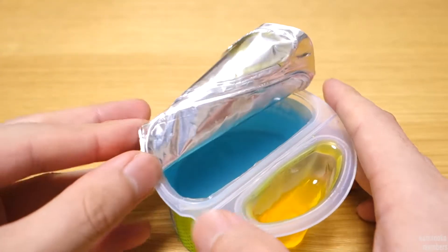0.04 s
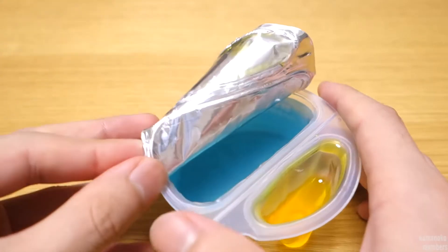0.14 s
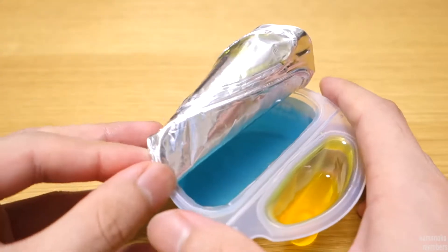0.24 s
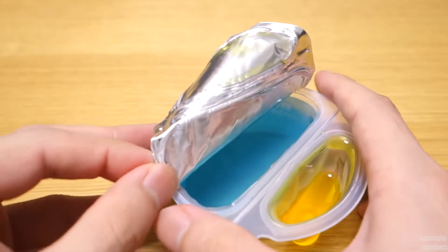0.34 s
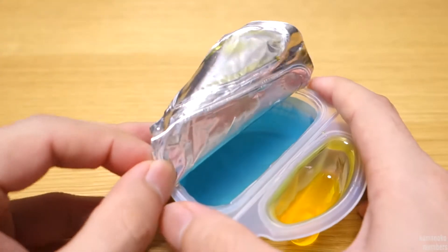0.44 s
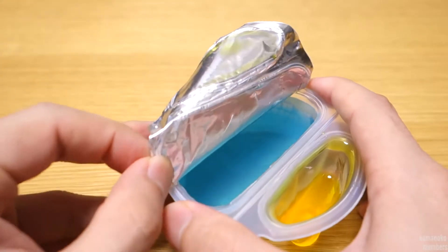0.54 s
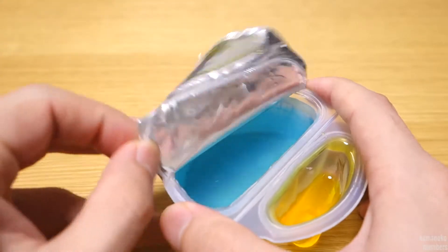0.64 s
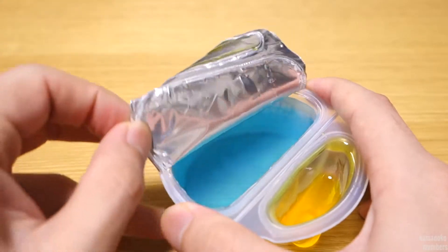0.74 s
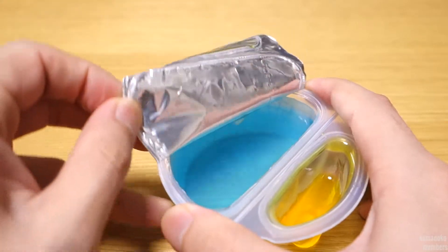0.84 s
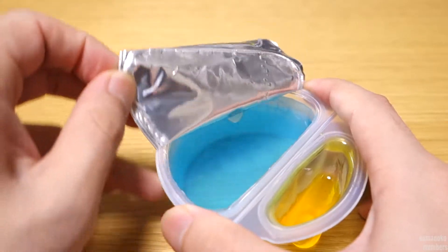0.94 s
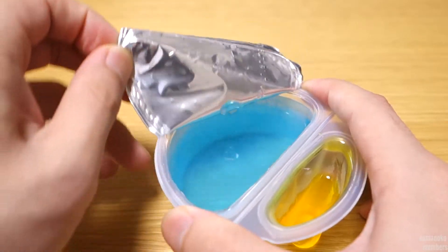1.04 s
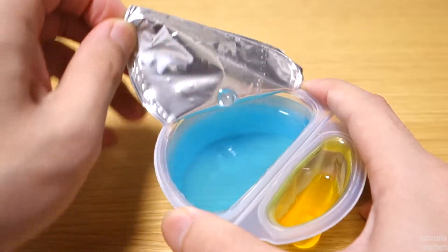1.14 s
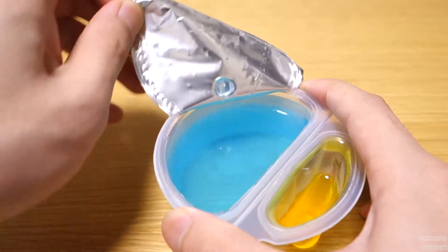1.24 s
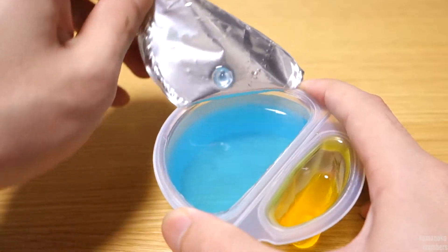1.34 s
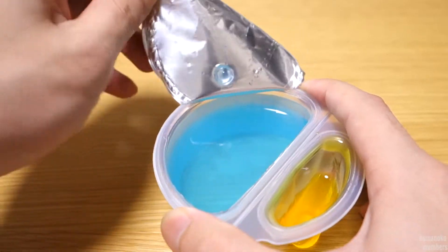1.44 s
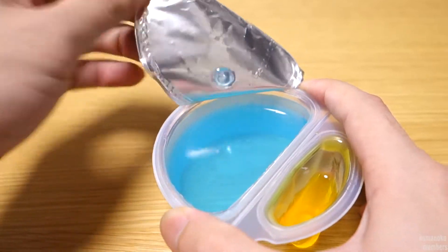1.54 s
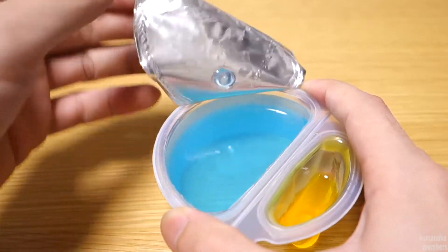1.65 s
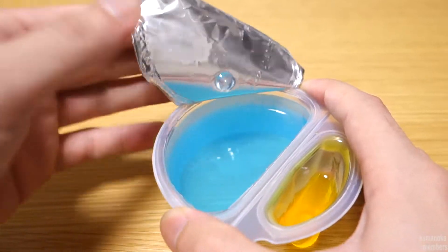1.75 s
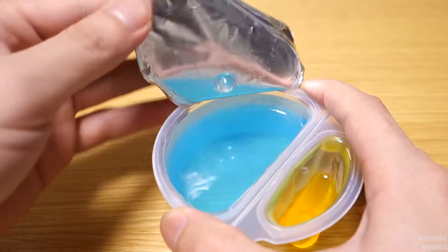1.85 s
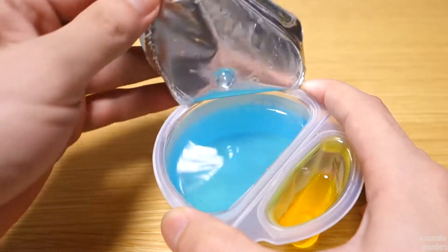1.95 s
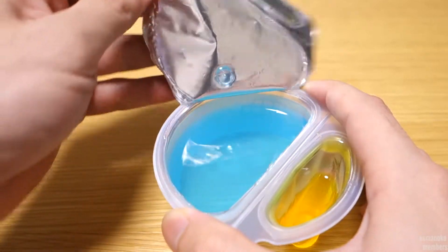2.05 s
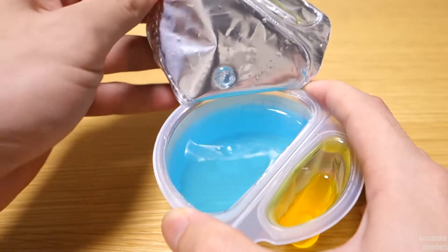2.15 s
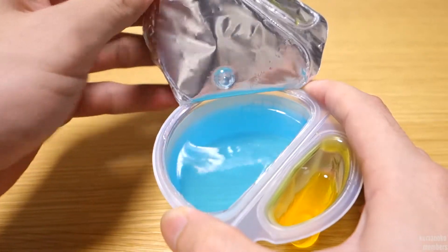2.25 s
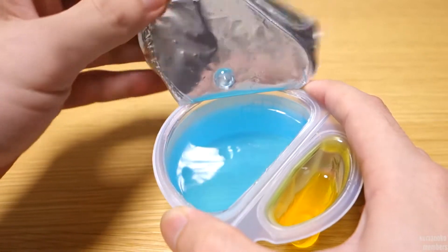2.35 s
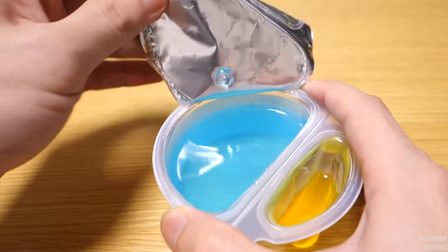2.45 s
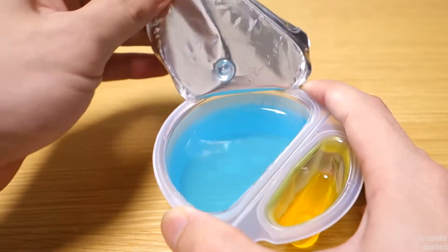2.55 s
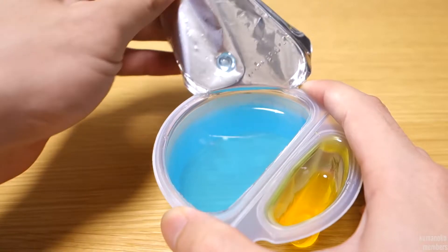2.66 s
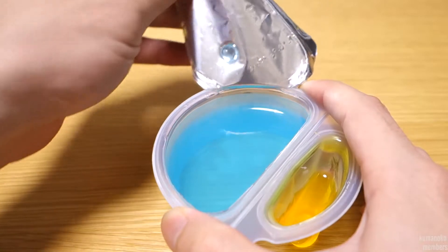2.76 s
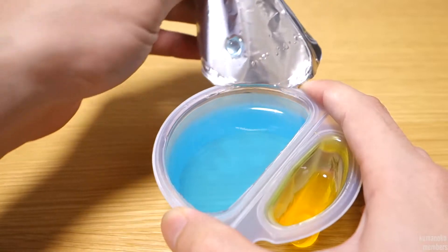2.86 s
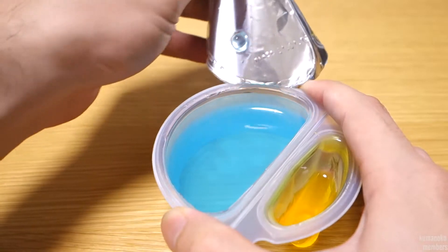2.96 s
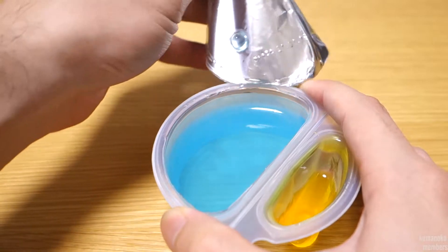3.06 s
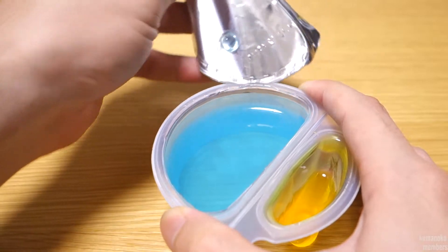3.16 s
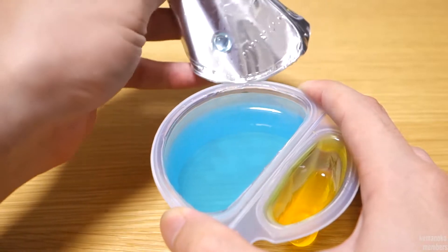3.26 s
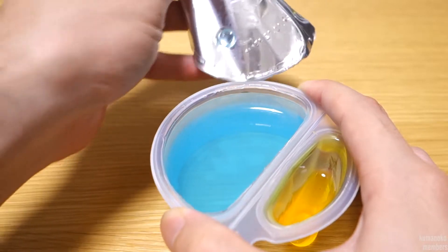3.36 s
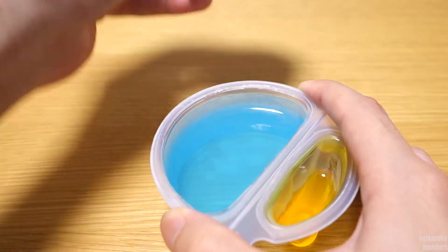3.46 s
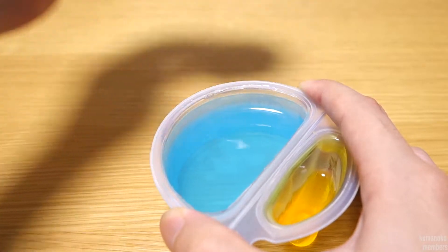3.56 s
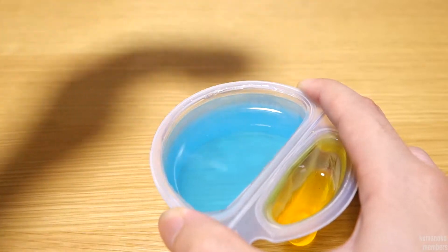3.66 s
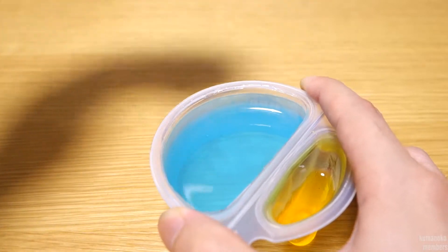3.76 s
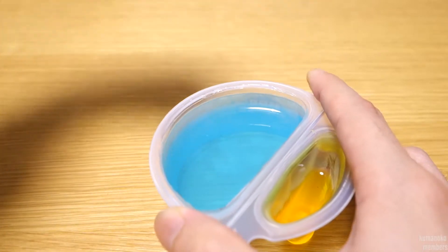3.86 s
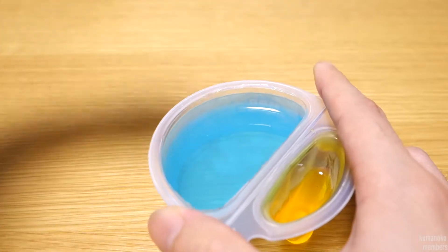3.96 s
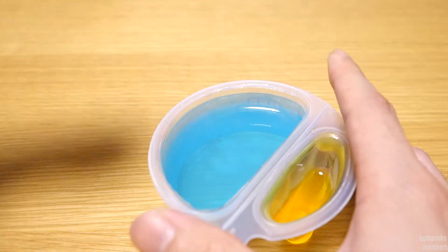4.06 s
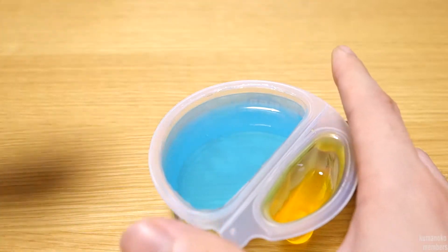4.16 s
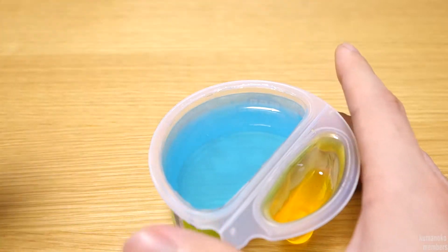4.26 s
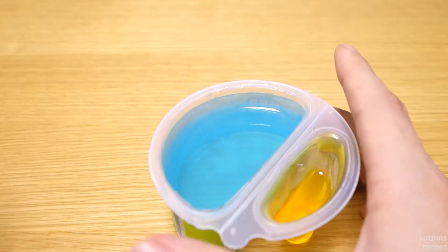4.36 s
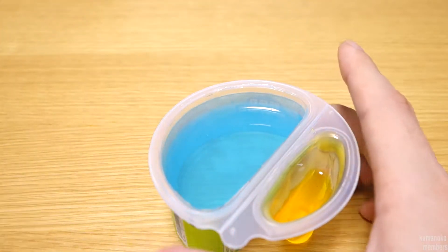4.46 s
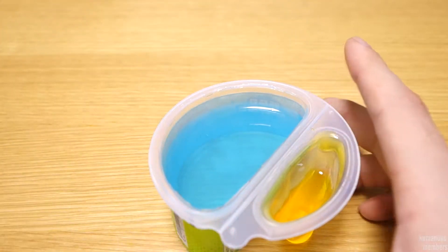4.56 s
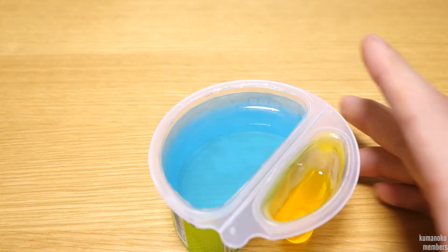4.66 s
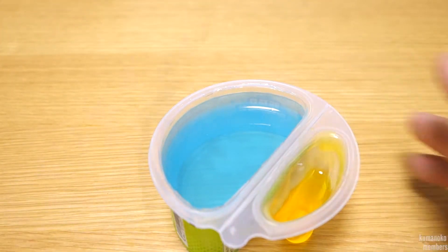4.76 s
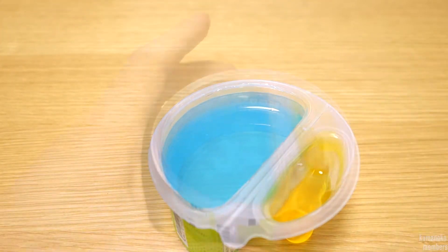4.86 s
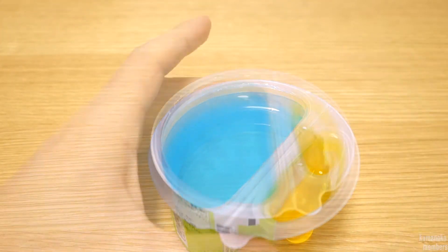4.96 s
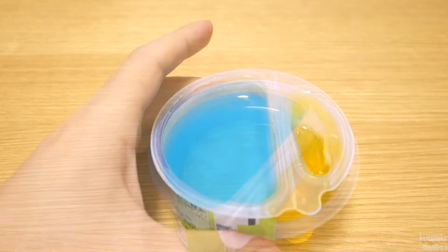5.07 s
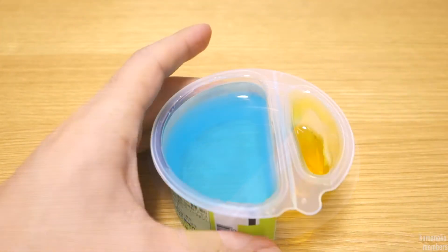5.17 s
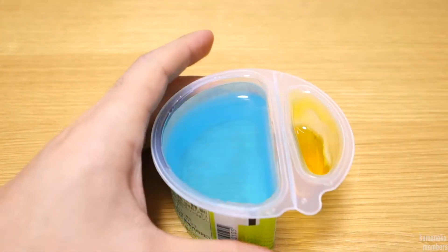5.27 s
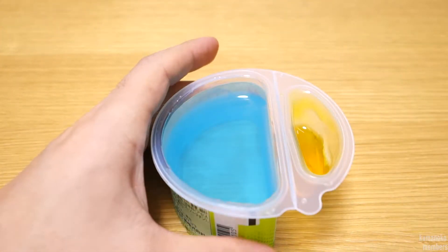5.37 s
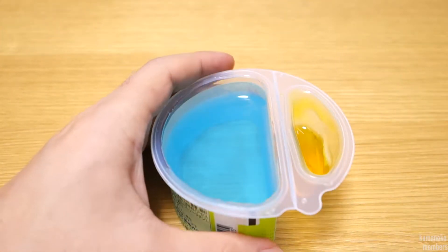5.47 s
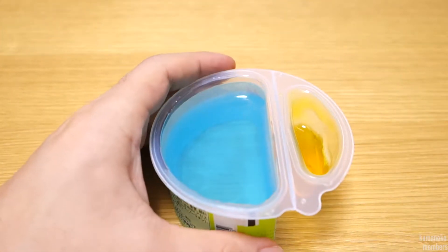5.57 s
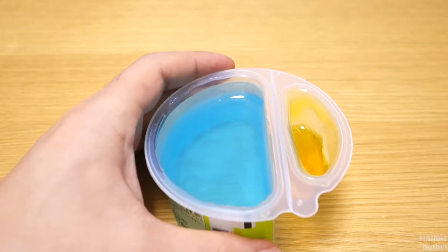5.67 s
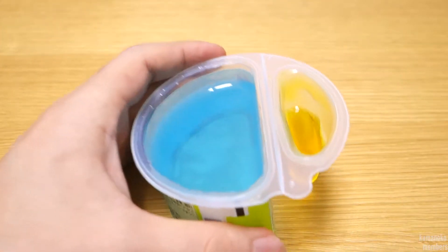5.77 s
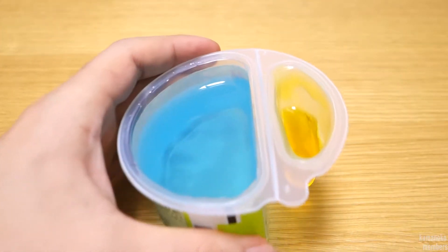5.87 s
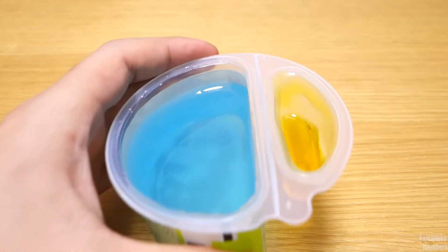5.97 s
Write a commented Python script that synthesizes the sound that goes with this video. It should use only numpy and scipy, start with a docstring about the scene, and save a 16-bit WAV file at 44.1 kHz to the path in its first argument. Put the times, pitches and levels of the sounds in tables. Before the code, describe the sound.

Close stereo foil crinkling and popping as a sealed cup is opened in a small room, fading to soft handling and appliance hum.

```python
"""A small room with a low appliance hum: a foil lid is pulled off a plastic jelly cup close to a stereo mic.
Snaps are short noise rips through dent, cup and foil resonances; the seal tears, the foil crackles and
scrapes, and fingers rub, all as many tiny slips over hiss in two bands. Bumps ring table-top modes. The room
adds a decaying stereo tail to all but the bumps; the hum is shaped, slightly patchy noise."""
import sys
import numpy as np
from scipy import signal
from scipy.fft import rfft, irfft, next_fast_len
from scipy.io import wavfile
from scipy.ndimage import uniform_filter1d

SR = 44100
rng = np.random.default_rng(int(sys.argv[2]) if len(sys.argv) > 2 else 0)


def volts(x):
    """Linear amplitude factor 10**(x/20) for a level x in dB, scalar or array-like."""
    e = np.asarray(x, float) / 20
    return 10 ** e


def put_to_file(sound):
    """Save the sound as 16-bit audio at rate SR, in the file named by the first command-line argument."""
    columns = np.atleast_2d(sound).T  # one column per channel
    safe = np.clip(columns, -1, 1)
    whole_steps = np.round(safe * 32767)
    wavfile.write(sys.argv[1], SR, whole_steps.astype(np.int16))


N = 265036  # samples

# buckling snaps, before the room: t/s, peak level/dB, dent f/Hz, cup thump/dB re dent, treble/dB re dent
SNAPS = [(0.082, -42, 1620, -38, -24), (0.134, -20, 2560, -24, -30), (0.138, -6.5, 2630, -37, -1),
         (.144, -17.5, 1980, -37, -30), (0.259, -37.5, 1540, -19, -40), (.364, -42.5, 1190, -2, -26),
         (.442, -6.5, 2600, -36, -13), (0.587, -35, 2360, -28.5, -10), (.592, -12.5, 2550, -43, -34.5),
         (0.596, -15, 1920, -39.5, -30.5), (.644, -42, 2480, 13, -5), (.667, -21, 1860, -18, -8.5),
         (.685, -5.5, 2480, -14, -46), (0.701, -5.5, 2450, -17, -41), (.741, -16.5, 2460, -17, -35),
         (.784, -23, 1720, -13, -54), (.821, -39, 2030, -4, -27), (.826, -24, 2150, 5, -41.5),
         (0.833, -16.5, 1940, -18, -51), (0.881, -24, 1370, -8.5, -41.5), (0.929, -15.5, 2350, -24, -19),
         (.961, -9, 2900, -12.5, -32), (1.012, -17.5, 1770, -21, -15), (1.112, -8.5, 3160, -23.5, -35),
         (1.177, -14, 2390, -23, -22), (1.261, -21.5, 1850, -18, -31), (1.336, -6, 1790, -25.5, -1.5),
         (1.464, -14.5, 1270, -49, -33), (1.497, -28, 1480, -34, -41), (1.551, -43, 1180, 6, -49),
         (1.589, -17.5, 1700, -11, -2), (1.609, -23, 1440, -16.5, -3), (1.668, -26.5, 5860, -16.5, -21),
         (1.689, -21, 1770, -19, -13), (1.692, -2.5, 1770, -14.5, 4.5), (1.711, -18, 1840, -20.5, -11),
         (1.812, -26.5, 1880, -14, -10), (1.887, -13, 1840, -20, -4.5), (1.898, -30.5, 1840, -37, -12),
         (1.931, -14.5, 1520, -31.5, -37.5), (1.946, -6.5, 3750, -43, -5.5), (2.07, -23, 1540, -10.5, -12),
         (2.107, -24, 4320, -4.5, -5.5), (2.121, -12, 3370, -14, -6.5), (2.136, -26.5, 1160, -31, 0),
         (2.307, -37, 5000, -35, -1), (2.316, -9, 3000, -10.5, 0), (2.327, -20, 1870, -25, -16),
         (2.396, -24.5, 2550, -8, -2), (2.408, -29, 1140, -20.5, 0), (2.47, -11, 1530, -38, 4),
         (2.484, -11, 1590, -37, 0), (2.517, -21, 1140, -3, -15), (2.564, -26, 1460, 9, -23),
         (2.599, -2, 1660, -35.5, -0.5), (2.614, -21.5, 1520, -9.5, -18.5), (2.677, -20.5, 1620, -35, 17),
         (2.692, -15.5, 2570, -22.5, -29), (2.827, -21, 1440, -48, 2), (2.892, -23, 4700, -33, 3),
         (3.087, -39, 1160, -34, -10), (3.099, -26, 1260, -26, 0.5), (3.115, -12.5, 2100, -11, -8.5),
         (3.326, -28, 1820, -18, -28), (3.363, -36, 1260, 4, -38), (3.418, -35, 3530, -30, 3),
         (3.434, -9.5, 3620, -33, 4), (3.529, -24, 5030, -23.5, -10), (3.559, -22, 4940, -26, -9),
         (3.576, -18, 4850, -44, -27), (3.621, -22.5, 4800, -26, -19), (3.652, -24, 2780, -32, 19),
         (3.668, -22, 2850, -12, -1), (3.732, -17, 3760, -23.5, -30), (3.74, -16.5, 3620, -21, -5),
         (3.763, -29, 2330, -27, -25), (3.934, -38, 4850, -16, -41), (4.053, -32, 1800, -39, -38),
         (4.278, -33.5, 3400, -32, -1), (4.701, -43.5, 1770, -3, -1)]
# rip length at 0 dB; natural-log growth per dB; natural-log spread
RIP_MS, RIP_GROWTH_PER_DB, RIP_LOG_SPREAD = 3.9, 0.015, 0.094
# lid and cup resonances: f/Hz, width/Hz, level/dB (broad part at -10 dB)
FOIL_MODES = [(596, 92, -15.5), (1794, 99, -11.5), (2550, 160, -18), (3470, 120, -16), (4890, 1100, -17),
              (8740, 600, -18.5), (10040, 66, -34)]
# strain on the lid, later grip on the cup: t/s, creasing body rms level/dB before the room
STRAIN = [(0.0, -52), (0.53, -59), (0.63, -61), (0.8, -49), (1.59, -53), (1.82, -44), (1.97, -56),
          (2.14, -60.5), (2.37, -73), (2.54, -49.5), (3.16, -60.5), (3.42, -66.5), (3.58, -56), (3.63, -63),
          (3.72, -59.5), (4.48, -72.5), (5.5, -76), (6.0, -67)]
CREASE_TREBLE_DB = -8  # re body

# Stroke tables: t/s of the peak, body peak level/dB before the room, rise/s, fall/s, treble/dB re body
# the seal tears; last, the cup scuffs
TEARS = [(.712, -30, .008, .08, -13.5), (.75, -54, .02, 0.05, -45), (3.44, -31, 0.012, 0.052, -32),
         (3.53, -49.5, 0.081, 0.068, 2.5), (4.715, -64.5, 0.035, 0.056, -21)]
# dense scrapes of the loose foil
SCRAPES = [(1.7, -37, 0.0058, 0.046, 7), (1.751, -30.5, 0.018, 0.017, 6.5), (1.785, -38.5, 0.034, 0.052, 0),
           (1.89, -39.5, .012, 0.048, 3.5), (3.455, -40.5, 0.025, 0.086, 7.5),
           (3.655, -37.5, 0.0021, 0.066, -0.5), (3.705, -30.5, 0.041, 0.038, -1.5),
           (3.745, -34, 0.038, 0.01, -24)]
# fingers slide on plastic and wood
RUBS = [(4.04, -57, 0.088, 0.036, -0.5), (4.185, -59.5, .09, 0.036, -2.5), (4.315, -58, 0.075, .03, 6),
        (4.72, -72.5, 0.1, 0.12, 10), (4.955, -71.5, 0.11, 0.086, 10), (5.83, -66.5, 0.23, 0.16, -6)]
FADE_DB, SWELL = 20, 1.39  # drop over one rise or fall; exponent, above 1 lingers near the peak

# loose sheet resonances: f/Hz, width/Hz, level/dB (broad part at -1 dB)
SHEET_MODES = [(2200, 110, 5), (2740, 100, 3), (3704, 144, 10.5), (4070, 160, 6), (5110, 352, 10.5),
               (6120, 100, 1), (8230, 260, 8.5), (9840, 600, 5)]
# spectral tilt of all near sounds, weak at the very top: f/Hz, level/dB
NEAR_TILT = [(60, 8.5), (9000, -3.5), (12000, -3.5), (15000, -10), (16200, -32.5), (16600, -55)]
# the cup bumps the table: t/s, peak level/dB
BUMPS = [(0.298, -44.5), (0.701, -39), (0.838, -38), (1.237, -38.5), (1.338, -46), (1.588, -39.5),
         (1.956, -41.5), (2.118, -42), (2.326, -50), (2.399, -39.5), (2.512, -47), (3.117, -55),
         (3.439, -32), (4.697, -43.5), (5.02, -47.5), (5.637, -43.5)]
# table-top modes: f/Hz, relative level/dB, t60/s
TABLE_MODES = [(122, -2.5, 0.067), (244.3, 5, 0.17), (292.9, 0, 0.26), (391, -5, 0.17)]
# room decay: f/Hz, t60/s
ROOM_T60 = [(300, 0.29), (1000, 0.34), (3000, 0.25), (8000, 0.29), (15000, 0.32)]
# room tail: f/Hz, left-right likeness
ROOM_ALIKE = [(500, 0.92), (2000, 0.66), (6000, 0.13), (14000, 0.19)]
# smeared echo of the nearest wall: delay/s, spread/s, level/dB over the tail
WALL = (0.0161, 0.0019, 4)
LEAD_US = 16.5  # usual gap between arrivals at the two capsules
# hum and hiss spectrum: f/Hz, relative density/dB per Hz
HUM_SPECTRUM = [(15, -47.5), (25, -41), (48, -10.5), (102, -3.5), (161, -6.5), (354, -11), (545, -25.5),
                (659, -22.5), (1190, -24), (1890, -17), (2610, -33), (3160, -33), (4490, -33.5),
                (9840, -45), (13800, -47), (15200, -62), (16500, -81)]
# bands standing out of the hum, low ones narrow, last a broad hiss: f/Hz, width/Hz, level/dB (rest at 3 dB)
HUM_BANDS = [(110, 31, 2), (214, 30, 6), (292.6, 34, 6.5), (658, 8.4, 7), (1965, 65, 4.5), (9600, 1800, 8)]
# hum: f/Hz, left-right likeness
HUM_ALIKE = [(60, 1), (240, 0.98), (950, 0.16), (3770, -0.92), (15000, 0.15)]
HUM_RMS_DB = -53
# capsule colour: f/Hz, left over right level/dB
LEFT_OVER_RIGHT = [(300, -0.55), (2000, 0), (4000, -0.7), (9000, -1.2)]


def snap(hz, thump_db, treble_db, ms):
    """A dent flips: a few ms of ripping, heard through its own pitch, the cup and the foil."""
    t = np.arange(2048) / SR
    length_s = np.clip(ms, 0.3, 20) / 1000
    decay = np.exp(-(t / length_s) ** 1.3) + 2.2 * np.exp(-t / 0.00043) + 0.33 * np.exp(-t / 0.0087)
    envelope = (1 - np.exp(-t / 0.0001)) * decay
    rip = envelope * rng.standard_normal(len(t))
    first_tear = rip * (0.22 + np.exp(-t / length_s))  # source of most treble

    def dent(f):
        ring = peak(f, hz, 0.25 * hz) + 0.8
        return ring * peak(f, hz, 1.43 * hz + 1300) ** 3

    def cup(f):
        return -peak(f, 606, 1100) ** 2

    def bending_lag(f):
        # the treble arrives first
        return np.exp(-1j * 0.55 * np.sqrt(f))

    parts = []
    for push, colour in [(rip, dent), (rip, cup), (first_tear, treble)]:
        part = filtered(push, lambda f: colour(f) * foil(f) * bending_lag(f))
        parts.append(part / np.linalg.norm(part))
    sound = volts(np.array([0, thump_db, treble_db])) @ np.array(parts)
    return sound / np.abs(sound).max()


def snaps():
    """Every snap comes from another spot, so the room answers each one anew."""
    out = np.zeros((2, N + SR))
    for s, db, hz, thump_db, treble_db in SNAPS:
        ms = RIP_MS * np.exp(RIP_GROWTH_PER_DB * db + RIP_LOG_SPREAD * rng.normal())
        heard = volts(db) * room(snap(hz, thump_db, treble_db, ms), tail_db=-8.5)
        out[:, round(s * SR):][:, :heard.shape[1]] += heard
    return out[:, :N]


def foil(f):
    """Resonances of the lid on its cup."""
    return modes(f, FOIL_MODES, broad_db=-10)


def tears():
    """The seal gives way in dense rough slips that shake the whole cup."""
    def cup(f):
        return foil(f) * (peak(f, 980, 2600) + 0.57 * peak(f, 2600, 500))

    return friction(strokes(TEARS), slips(per_second=1500, spread_db=3, hiss=0.3), cup)


def crackle():
    """Faint steady creasing of the strained foil, its level following the strain."""
    strain_db = np.interp(np.arange(N) / SR, *np.transpose(STRAIN))
    level = volts(strain_db + np.array([[0], [CREASE_TREBLE_DB]]))
    return friction(level, slips(per_second=1800, spread_db=3, hiss=0.6), foil)


def scrapes():
    """The loose sheet has its own modes and gives off little below them."""
    def sheet(f):
        radiation = peak(f, 4160, 8000) ** 2 - 1.3 * peak(f, 13000, 6400) ** 2
        return modes(f, SHEET_MODES, broad_db=-1.0) * radiation

    return friction(strokes(SCRAPES), slips(per_second=3500, spread_db=2, hiss=0.6), sheet)


def rubs():
    """Skin slides smoothly: small slips under a strong rubbing hiss."""
    def skin(f):
        return peak(f, 6000, 9000) + 3 * peak(f, 14000, 6000)

    return friction(strokes(RUBS), slips(per_second=3000, spread_db=2, hiss=1.5), skin)


def strokes(rows):
    """Body and treble gains of strokes that swell to a peak and fade."""
    t, level = np.arange(N) / SR, np.zeros((2, N))
    for s, db, rise, fall, treble_db in rows:
        away = np.where(t < s, (s - t) / abs(rise), (t - s) / abs(fall))
        level += volts(db + np.array([[0], [treble_db]]) - FADE_DB * away ** SWELL)
    return level


def slips(per_second, spread_db, hiss):
    """Tiny slips of very unequal size over a rubbing hiss."""
    spread = volts(spread_db * np.minimum(rng.exponential(size=N), 3))
    size = spread * rng.standard_normal(N)
    happens = rng.random(N) < per_second / SR
    return unit(happens * size) + hiss * rng.standard_normal(N)


def friction(level, rub, colour):
    """Slips heard in two bands, each under its own gain."""
    bands = [unit(filtered(rub, lambda f: band(f) * colour(f))) for band in (body, treble)]
    return (level * bands).sum(axis=0)


def body(f):
    """Middle band of the foil's sound."""
    return peak(f, 2200, 2500) ** 2


def treble(f):
    """Upper band of the foil's sound, in step with the middle band where they meet."""
    return -peak(f, 7700, 8000) ** 2


def bumps(attack_s=0.0027):
    """A soft push rings the table top at new mode strengths each time."""
    out, t = np.zeros(N + SR), np.arange(SR // 2) / SR
    for s, db in BUMPS:
        ring = np.zeros(len(t))
        for hz, mode_db, t60_s in TABLE_MODES:
            decay_db = mode_db + rng.normal(0, 1.0) - 60 * t / t60_s
            ring += volts(decay_db) * np.sin(2 * np.pi * hz * t)
        ring *= 1 - np.exp(-t / attack_s)
        out[round(s * SR):][:len(t)] += volts(db) * ring / np.abs(ring).max()
    return out[:N]


def room(x, tail_db):
    """Direct sound from one side, then a tail in which each frequency dies at its own speed."""
    hz, t, z = signal.stft(rng.standard_normal((2, SR // 3)), SR, nperseg=256)
    decay = volts(-60 * t / along(ROOM_T60, hz)[:, None])
    tail = signal.istft(z * decay, SR, nperseg=256)[1]
    n = np.arange(tail.shape[1])
    delay_s, spread_s, wall_db = WALL
    echo = volts(wall_db * np.exp(-((n / SR - delay_s) / spread_s) ** 2))
    tail *= (1 - np.exp(-n / SR / 0.0046)) * echo
    answer = volts(tail_db) * paired(tail / np.linalg.norm(tail[0]), ROOM_ALIKE)
    gap = rng.choice([-1, 1]) * rng.uniform(0.14, 1.88) * LEAD_US * 1e-6 * SR  # samples
    arrival = n - 16 + np.array([[0.5], [-0.5]]) * gap
    answer += np.sinc(arrival) * np.exp(-(arrival / 8) ** 2)  # windowed fractional delay
    return signal.fftconvolve(x[None], answer, axes=1)[:, 16:]


def hum(patchy_db=3.0):
    """Appliance rumble and microphone hiss: shaped noise, slightly patchy over time and frequency."""
    z = signal.stft(rng.standard_normal((2, N)), nperseg=1024)[2]
    field = rng.standard_normal(z.shape[1:])
    field = uniform_filter1d(uniform_filter1d(field, size=4, axis=0), size=8, axis=1)
    pair = signal.istft(z * volts(patchy_db * unit(field)), nperseg=1024)[1][:, :N]

    def colour(f):
        return volts(along(HUM_SPECTRUM, f)) * modes(f, HUM_BANDS, broad_db=3.0)

    return volts(HUM_RMS_DB) * unit(paired(filtered(pair, colour), HUM_ALIKE))


def modes(f, table, broad_db):
    """Resonances standing on a broad radiation."""
    return np.prod([1 + volts(db - broad_db) * peak(f, hz, w) for hz, w, db in table], axis=0)


def peak(f, hz, width_hz):
    """One causal resonance."""
    return 1j * f * width_hz / (hz * hz - f * f + 1j * f * width_hz)


def paired(pair, alike):
    """Two unrelated signals mixed to left and right with a likeness per frequency."""
    def mid_side_gains(f):
        angle = np.arccos(np.clip(along(alike, f), -1, 1)) / 2
        return np.array([np.cos(angle), np.sin(angle)])

    mid, side = filtered(pair, mid_side_gains)
    return np.array([mid + side, mid - side])


def filtered(x, response):
    """x times a complex response of frequency."""
    n = x.shape[-1]
    m = next_fast_len(n + 4096)
    return irfft(rfft(x, m) * response(np.fft.rfftfreq(m, 1 / SR)), m)[..., :n]


def along(points, hz):
    """(Hz, value) points read on a log axis."""
    f, v = np.transpose(points)
    return np.interp(np.log(hz + 1), np.log(f + 1), v)


def unit(x):
    """Scale to rms 1."""
    return x / np.sqrt(np.mean(x ** 2) + 1e-20)


def scene():
    """Lid, fingers and cup in the room, table bumps, hum."""
    near = snaps()
    near += room(crackle() + tears() + rubs(), tail_db=-7.0)[:, :N]
    near += room(scrapes(), tail_db=-12)[:, :N]
    return filtered(near, lambda f: volts(along(NEAR_TILT, f))) + bumps() + hum()


def top_cut(x):
    """Nothing passes above the cut-off."""
    return signal.sosfilt(signal.butter(12, 16650, fs=SR, output="sos"), x)


def record(dry):
    """The two capsules differ a little in colour."""
    sides = filtered(dry, lambda f: volts(np.outer([0.5, -0.5], along(LEFT_OVER_RIGHT, f))))
    return top_cut(sides)


dry = scene()
out = record(dry)
put_to_file(out)
```